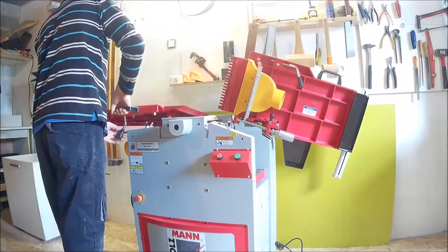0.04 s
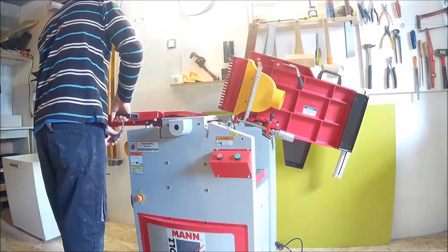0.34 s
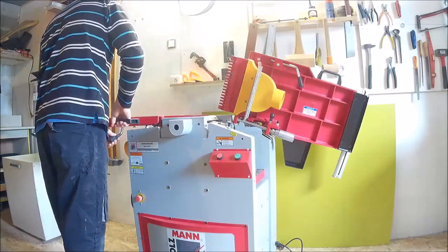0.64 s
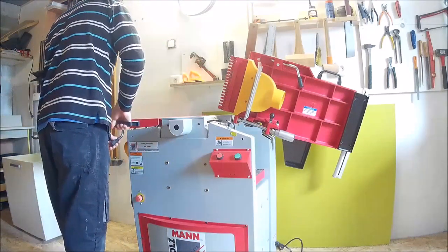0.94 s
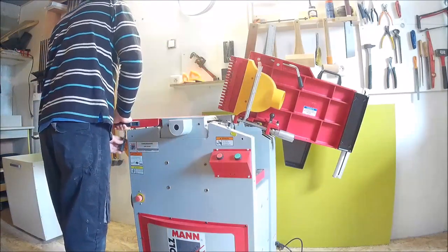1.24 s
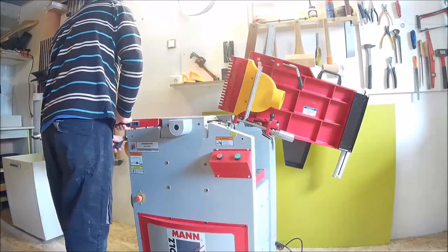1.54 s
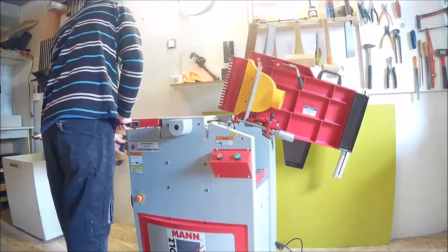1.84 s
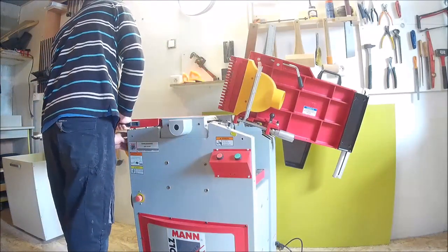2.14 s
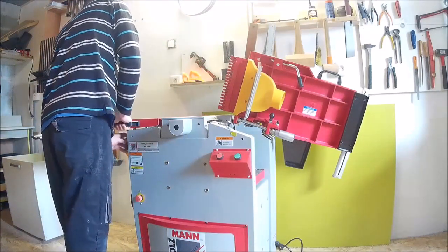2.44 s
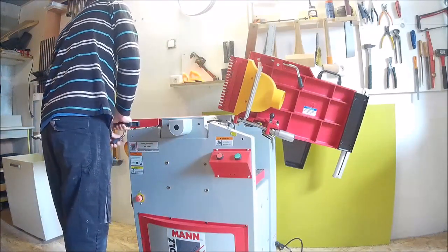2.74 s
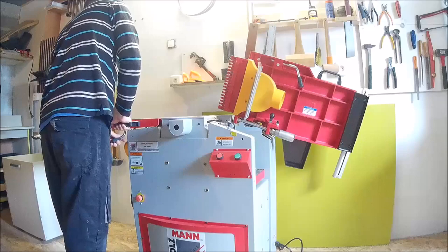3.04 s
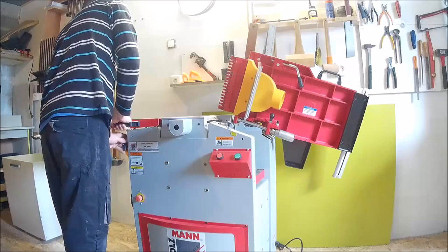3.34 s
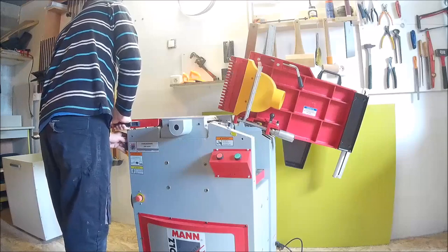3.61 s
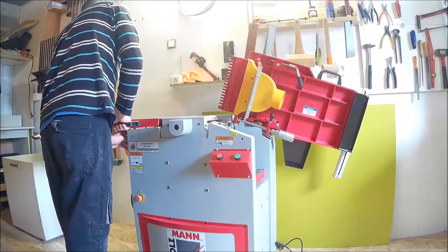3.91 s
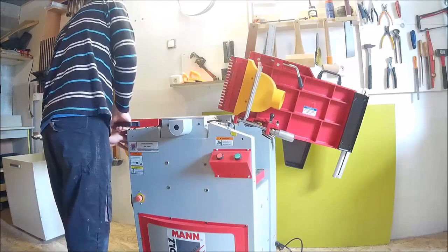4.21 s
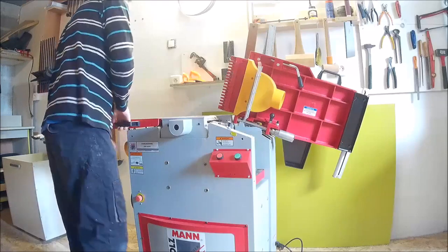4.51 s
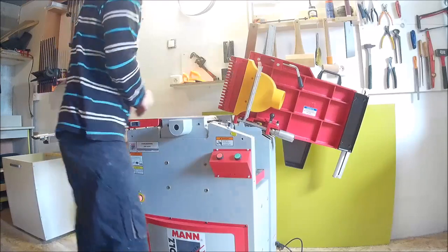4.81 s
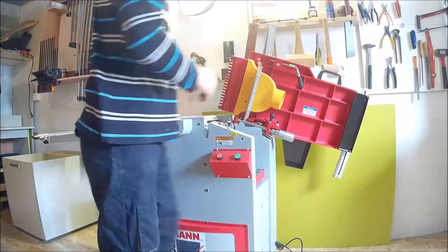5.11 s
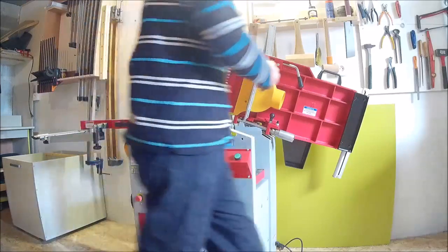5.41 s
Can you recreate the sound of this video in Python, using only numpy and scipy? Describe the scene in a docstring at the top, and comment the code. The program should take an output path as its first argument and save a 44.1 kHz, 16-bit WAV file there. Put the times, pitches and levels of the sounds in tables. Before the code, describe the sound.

A heavy metal machine table clunks down, then two steel locking levers slide and snap home, followed by faint rustling and footsteps.

```python
"""A small workshop, one microphone near a switched-off planer whose tables are locked by hand.
A catch clinks, the cast table drops onto its frame, and two steel locking levers slide in and snap
home, jolting the hollow frame. Each blow is a short rattle of crowded modes plus a few that ring on.
Then clothes rustle and soft steps cross the wooden floor, over quiet room tone.
The sliding steel sounds closest; the catch reaches the microphone mostly by way of the walls."""
import sys
import numpy as np
from scipy import signal
from scipy.fft import rfft, irfft
from scipy.io import wavfile
from scipy.ndimage import uniform_filter1d

SR = 44100
rng = np.random.default_rng(int(sys.argv[2]) if len(sys.argv) > 2 else 0)


def persist_wave(psi):
    """Save psi, clipped to +-1, as 16-bit WAV."""
    counts = np.round(np.clip(psi, -1, 1) * 32767).astype(np.int16)
    wavfile.write(sys.argv[1], SR, np.atleast_2d(counts).T)


N = 249606
TIME = np.arange(N) / SR
RING_TIME = TIME[:SR]  # one second for a blow to die away


# levers snapping home: t/s, level/dB, tilt/(dB per octave), jolt to the frame/dB
LOCK_SNAPS = [(1.474, -21.5, 1.06, -30.5), (2.674, -48, 0, -41.5), (2.868, -27, -0.8, -33)]
# the lock's clear modes: f/Hz, level/dB, t60/s
LOCK_MODES = [(1906, -15, 0.15), (2078, -14.5, 0.28), (2330, -5.5, 0.25), (2530, -29.5, 0.65),
              (4970, -5.5, .12), (6000, -9, 0.083), (6980, -4, 0.089), (7580, -3, .11), (8020, 1.5, 0.12),
              (7970, 2.5, 0.076), (8250, -6.5, 0.087), (8280, -5.5, .13), (8500, -8.5, .12),
              (8650, -1.5, 0.13), (8866, 0.5, 0.1), (9100, -0.5, .13), (9200, -8.5, 0.11), (9510, 1, .13),
              (12100, -11, 0.095)]
# spectrum of its rattle: f/Hz, level/dB
LOCK_SPECTRUM = [(100, -42.5), (500, -28.5), (1500, -33), (2500, -6.5), (3700, -18), (5000, -8.5),
                 (6200, -9.5), (7200, -1.5), (9300, 1.5), (10200, -13), (13500, -19), (15500, -37)]

def lock_snaps(t60=.092, rebound_s=.007, rebound_db=-4):
    """A steel lever hits its stop, rebounds and hits it again more softly."""
    blows = [(s + delay, db + softer, tilt_db, t60) for s, db, tilt_db, _ in LOCK_SNAPS
             for delay, softer in ((0, 0), (rebound_s, rebound_db))]
    return struck(blows, LOCK_MODES, LOCK_SPECTRUM, push_s=.00019, ring_db=-6)


# the table landing: t/s, level/dB, tilt/(dB per octave), rattle t60/s
TABLE_HITS = [(.847, -37, 0.63, .12), (.866, -28.5, -2, 0.37), (.983, -36, -4, 0.072)]
# the casting's clear modes: f/Hz, level/dB, t60/s
TABLE_MODES = [(76.65, -20, .9), (98, -2.5, 0.18), (127, -12, .8), (134, -2.5, 0.14), (155, -1, .18),
               (177.2, -2, .3), (246.2, -8.5, 0.56), (283, -5.5, 0.11), (304, -1, .14), (326, 1, .16),
               (416, 1, .14), (416, -3.5, .15), (489, -11, 0.11), (760, -6, .16)]
# spectrum of its rattle: f/Hz, level/dB
TABLE_SPECTRUM = [(40, -26), (80, -12), (135, 2), (210, -7.5), (420, 1), (550, -7), (800, -10.5),
                  (1500, -14), (3000, -27.5), (5500, -30.5), (8500, -24), (11000, -27.5), (15000, -44)]

def table_drop():
    """The cast table lands on its frame, beds down and bounces once, ringing low."""
    return struck(TABLE_HITS, TABLE_MODES, TABLE_SPECTRUM, push_s=.0014, ring_db=-3)


# the frame taking up the load: t/s, level/dB, tilt/(dB per octave)
FRAME_KNOCKS = [(1.57, -37.5, -2.5), (2.53, -50.5, -2), (2.729, -40, -3.5), (2.762, -42, -0.5),
                (2.925, -42.5, 0.1), (3.07, -57, -6), (3.298, -58.5, -2.5)]
# the sheet steel's clear modes: f/Hz, level/dB, t60/s
FRAME_MODES = [(242.5, -8, 0.24), (299, -2, .16), (346, -2, 0.08), (441, 1.5, .14), (492.5, -0.5, 0.2),
               (673.4, 0.5, 0.18), (788, -4.5, 0.15), (1049, -6.5, 0.19)]
# spectrum of its rattle: f/Hz, level/dB
FRAME_SPECTRUM = [(40, -16.5), (100, -13.5), (170, -10), (250, -2.5), (480, -4), (750, -2.5), (1050, -10.5),
                  (1500, -6.5), (2500, -13.5), (3600, -12.5), (8000, -28.5), (15000, -47.5)]

def steel_frame(jolt_t60=.16, knock_t60=.1):
    """The hollow sheet-steel frame answers slowly to every snap, and knocks as the load shifts."""
    jolts = [(s, db, 0, jolt_t60) for s, _, _, db in LOCK_SNAPS]
    knocks = [(s, db, tilt_db, knock_t60) for s, db, tilt_db in FRAME_KNOCKS]
    return struck(jolts + knocks, FRAME_MODES, FRAME_SPECTRUM, push_s=.043, ring_db=-9)


# strokes of steel on steel: t/s, length/s, level/dB
SLIDES = [(1.438, 0.073, -48.5), (1.578, 0.045, -36.5), (2.667, 0.11, -42), (2.854, 0.012, -35.5)]
# spectrum of the scrape: f/Hz, level/dB
SLIDE_SPECTRUM = [(80, -13.5), (300, -12.5), (700, -14.5), (1300, -2.5), (2300, 4), (3200, -1.5), (5000, 5),
                  (8000, 3), (10500, -4), (12500, -19), (15000, -23.5)]

def sliding_shafts(slips_per_s=2500, grabs_per_s=150, grip_spread_db=1):
    """Close up, the lever shafts stick and slip in their bores: dense clicks, louder where they grab."""
    slips = (rng.random(N) < slips_per_s / SR) * rng.standard_normal(N)
    grip = undb(-grip_spread_db * rng.standard_normal(N)[(TIME * grabs_per_s).astype(int)])
    scrape = unit(colour(slips * grip, SLIDE_SPECTRUM)) * np.sqrt(N)
    return scrape * strokes(SLIDES, attack_s=.012, release_t60=.14)


# the pull on the free lever: t/s, level/dB, tilt/(dB per octave), rattle t60/s
LEVER_HITS = [(2.513, -52.5, 0, 0.37)]
# the lever's clear modes: f/Hz, level/dB, t60/s
LEVER_MODES = [(762, -8, .3), (1803, -8, .2), (2960, -11, .2), (4538, 0, 0.2), (4210, -14, .15),
               (5927, -2, 0.13), (6600, -4, .15), (7780, 9, 0.06), (8900, -1, 0.35), (9400, -3, 0.22)]
# spectrum of its rattle, and of its handle's: f/Hz, level/dB
LEVER_SPECTRUM = [(100, -55), (300, -18), (1100, -21), (2000, 2.5), (3500, -5.5), (4600, 2), (6500, -4.5),
                  (8000, 0), (9400, -12), (10300, -12), (15000, -20)]

def lever_pull():
    """The free lever rings brightly as it is pulled."""
    return struck(LEVER_HITS, LEVER_MODES, LEVER_SPECTRUM, push_s=.005, ring_db=-1)


# the handle's release: t/s, level/dB, tilt/(dB per octave), rattle t60/s
HANDLE_HITS = [(3.056, -49.5, 0, 0.17)]
# its clear modes: f/Hz, level/dB, t60/s
HANDLE_MODES = [(1906, -9, 0.25), (3034, -5.5, 0.28), (3106, -5, 0.27), (4930, -15.5, .15), (6158, -5, .13)]

def handle_click():
    """Close to the microphone, the lever's handle clicks as it is let go."""
    return struck(HANDLE_HITS, HANDLE_MODES, LEVER_SPECTRUM, push_s=.0003, ring_db=-7.5)


# clinks of the catch: t/s, level/dB, tilt/(dB per octave), rattle t60/s
CATCH_HITS = [(.399, -57.5, 1, .14), (.410, -50, -2, 0.22), (1.437, -53.5, 0, .1)]
# its clear modes: f/Hz, level/dB, t60/s
CATCH_MODES = [(426, -10, 0.39), (1247, -12, 0.23), (1740, -7, 0.13), (2153, 4.5, 0.097),
               (2087, -12.5, 0.11), (3030, -7.5, 0.088), (2906, -3, .1), (3610, -15, 0.11)]
# spectrum of its rattle: f/Hz, level/dB
CATCH_SPECTRUM = [(100, -21.5), (250, 1), (400, -3), (700, -3), (1300, -5.5), (2200, -5), (3200, -8.5),
                  (5000, -11), (9000, -15.5), (15000, -34.5)]

def catch_clinks():
    """The catch makes light contact and rings, sounding farther off."""
    return struck(CATCH_HITS, CATCH_MODES, CATCH_SPECTRUM, push_s=.0019, ring_db=2)


# shoes on the boards: t/s, level/dB, t60/s
STEPS = [(4.609, -68.5, 0.22), (4.759, -73.5, 0.054), (4.815, -65, 0.14), (5.493, -64.5, 0.12),
         (5.535, -58.5, 0.071), (5.61, -56.5, 0.06)]
# spectrum of a step before its tilt: f/Hz, level/dB
STEP_SPECTRUM = [(24, -7), (40, -3.5), (150, -3.5), (381, -9), (856, -10), (922, -14), (3910, -29),
                 (9230, -28), (14000, -31)]

def footsteps(push_s=.0008):
    """Soft soles scuff and tap the boards close by."""
    taps = np.zeros(N)
    push = 1 - np.exp(-RING_TIME / push_s)
    for s, db, t60 in STEPS:
        tap = colour(burst(fade(t60) * push), STEP_SPECTRUM, tilt_db=-1.26)
        add(taps, s, unit(tap), db)
    return taps


# a sleeve brushing past: t/s, length/s, level/dB
SLEEVE_BRUSHES = [(3.275, 0.022, -61), (4.57, .05, -75.5), (4.75, 0.043, -62)]
# spectrum of rubbing cloth: f/Hz, level/dB
CLOTH_SPECTRUM = [(100, 8), (500, -2.5), (1500, -4.5), (5000, -4), (9500, 2.5), (15000, -15.5)]

def clothes(walk_start_s=4.49, walk_build_s=1.3, full_pace_db=-71):
    """Heard dry, sleeves brush in short strokes; the trousers' rustle grows with the walking pace."""
    pace = np.clip((TIME - walk_start_s) / walk_build_s, 0, 1)
    trousers = undb(full_pace_db) * np.sqrt(pace)
    sleeves = strokes(SLEEVE_BRUSHES, attack_s=.015, release_t60=.34)
    return hiss(CLOTH_SPECTRUM) * np.hypot(sleeves, trousers)


# the workshop's decay: f/Hz, t60/s
ROOM_T60 = [(80, 1), (200, 1), (500, 0.93), (2000, 0.69), (6000, .6), (9000, 0.45), (14000, .36)]

def reverberation(build_s=.003, hold_s=.091, duck_db=-14, duck_s=.0079):
    """Room reverberation that holds for a tenth of a second, then ducks abruptly, as by a noise gate."""
    duck = undb(duck_db * np.clip((RING_TIME - hold_s) / duck_s, 0, 1))
    shape = (1 - np.exp(-RING_TIME / build_s)) * duck
    mid_decay = fade(lookup(ROOM_T60, 1000))
    spectrum = rfft(burst(shape * mid_decay), 2 * SR)
    hz = np.arange(SR + 1) / 2
    centres = np.geomspace(60, 15000, 9)
    tail = 0
    # each octave dies away at its own pace, the treble first
    for centre, share in zip(centres, np.eye(len(centres))):
        band = irfft(spectrum * lookup(np.c_[centres, share], hz))[:SR]
        tail = tail + band * fade(lookup(ROOM_T60, centre)) / mid_decay
    return tail


# spectrum of the quiet workshop: f/Hz, level/dB
ROOM_TONE = [(12, -37), (20, -4), (54, 4), (70, -8.5), (106, -2.5), (122, -17), (153, -4.5), (175, -12.5),
             (306, -14.5), (667, -20.5), (725, -21), (2840, -26.5), (3850, -28), (13900, -28), (15500, -30)]

def room_tone(level_db=-66):
    """A faint, steady rumble and hiss lie behind everything."""
    return hiss(ROOM_TONE) * undb(level_db)


def struck(hits, modes, spectrum, push_s, ring_db):
    """Each blow builds over push_s and rattles the crowded modes; clear ones ring ring_db above that."""
    track = np.zeros(N)
    push = 1 - np.exp(-RING_TIME / push_s)
    rings = np.array([undb(db) * fade(t60) * np.exp(2j * np.pi * hz * RING_TIME)
                      for hz, db, t60 in modes])
    for s, db, tilt_db, t60 in hits:
        rattle = colour(burst(fade(t60) * push), spectrum, tilt_db)
        add(track, s, unit(rattle), db)
        phases = np.exp(2j * np.pi * rng.random(len(modes)))
        ring = (phases @ rings).imag * push
        add(track, s, unit(ring), db + ring_db)
    return track


def strokes(rows, attack_s, release_t60):
    """Gain of rubbing strokes: each swells, holds to the end of its length and dies away."""
    gain = 0
    for s, length, db in rows:
        swell = np.clip((TIME - s) / attack_s, 0, 1)
        release = np.exp(-np.log(1000) * np.maximum(TIME - s - length, 0) / release_t60)
        gain = gain + undb(db) * swell * release
    return gain


def burst(envelope, smoothing=9):
    """Noise under an envelope, with its energy spread evenly over frequency."""
    spectrum = rfft(rng.standard_normal(SR) * envelope)
    bins = int(smoothing * SR * np.sum(envelope ** 4) / np.sum(envelope ** 2) ** 2) + 1
    power = uniform_filter1d(np.abs(spectrum) ** 2, bins)
    flat = irfft(spectrum / np.sqrt(power), SR)
    gate = np.minimum(20 * envelope / envelope.max(), 1)
    return unit(flat * gate)


def hiss(spectrum):
    """Steady noise of unit level."""
    return unit(colour(rng.standard_normal(N), spectrum)) * np.sqrt(N)


def colour(x, points, tilt_db=0, size=4096):
    """Causal filter of unit energy with the given spectral shape, tilted by tilt_db per octave."""
    hz = np.arange(size // 2 + 1) * SR / size
    gain = undb(lookup(points, hz) + tilt_db * np.log2(hz + 20))
    cepstrum = irfft(np.log(gain))
    cepstrum[1:size // 2] *= 2  # folded for minimum phase
    cepstrum[size // 2 + 1:] = 0
    impulse = irfft(np.exp(rfft(cepstrum)))
    return signal.fftconvolve(x, unit(impulse))[:len(x)]


def add(track, s, sound, db):
    """Mix a unit-energy sound in at time s; db is its level if spread over a twentieth of a second."""
    start = int(s * SR)
    part = sound[:N - start]
    track[start:start + len(part)] += undb(db) * np.sqrt(SR / 20) * part


def fade(t60):
    """Decay by 60 dB in t60 seconds."""
    return np.exp(-np.log(1000) * RING_TIME / max(t60, 1 / SR))


def lookup(points, hz):
    """Read (f/Hz, value) points on a log-frequency axis."""
    f, value = np.transpose(points)
    return np.interp(np.log(hz + 1), np.log(f), value)


def unit(x):
    """Scale to an energy of one."""
    return x / np.sqrt(np.sum(x ** 2))


def undb(db):
    """Decibels to gain."""
    return 10 ** (np.asarray(db) / 20)


def scene():
    """Planer and steps reach the microphone straight and off the walls, over clothes and room tone."""
    # sound, direct over reverberant/dB: the higher, the closer it seems
    sources = [(lock_snaps() + lever_pull(), 1),
               (table_drop() + steel_frame(), 1),
               (sliding_shafts(), 10.5),
               (handle_click(), 8.5),
               (catch_clinks(), -6),
               (footsteps(), 2)]
    direct = sum(x * undb(db) / np.hypot(1, undb(db)) for x, db in sources)
    to_walls = sum(x / np.hypot(1, undb(db)) for x, db in sources)
    reflected = signal.fftconvolve(to_walls, reverberation())[:N]
    return (direct + reflected + clothes() + room_tone())[None]


def record(dry):
    """The mono recorder rounds the loudest peaks and cuts the top."""
    ceiling, top_hz = .55, 15500
    rounded = ceiling * np.tanh(dry / ceiling)
    lowpass = signal.ellip(10, .2, 70, top_hz, fs=SR, output="sos")
    return signal.sosfilt(lowpass, rounded)


dry = scene()
out = record(dry)
persist_wave(out)
```